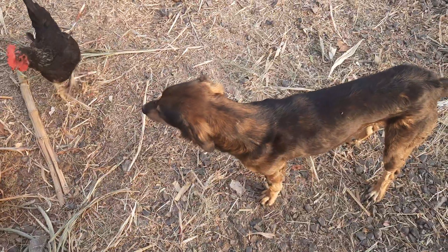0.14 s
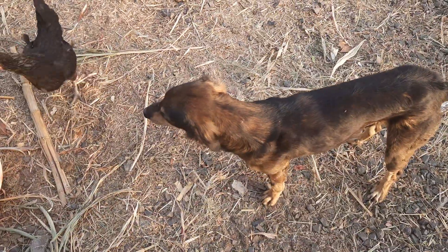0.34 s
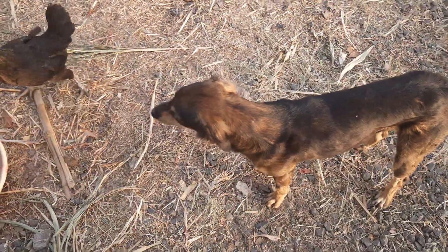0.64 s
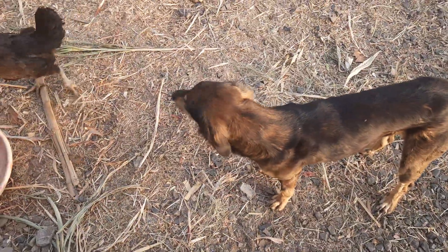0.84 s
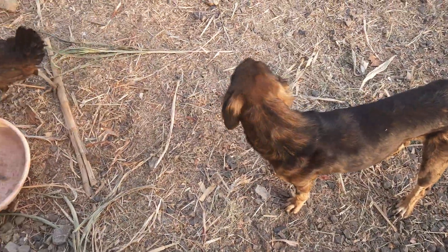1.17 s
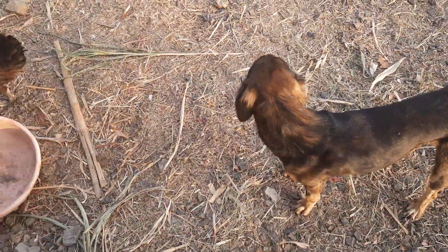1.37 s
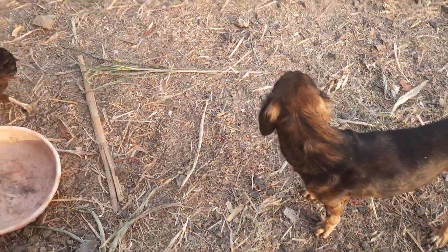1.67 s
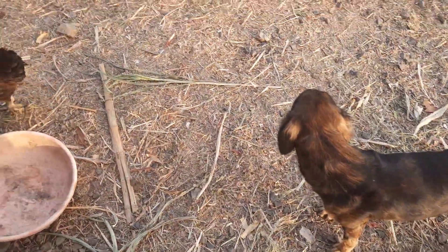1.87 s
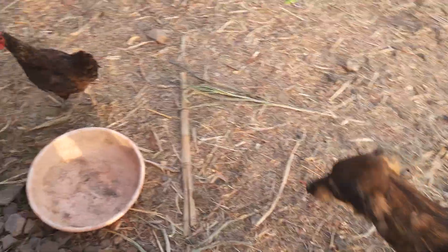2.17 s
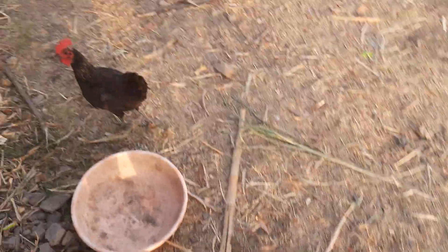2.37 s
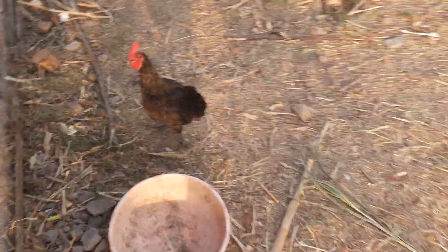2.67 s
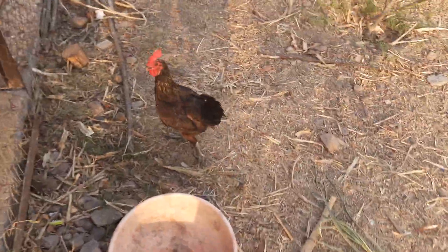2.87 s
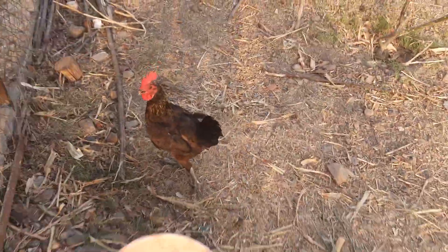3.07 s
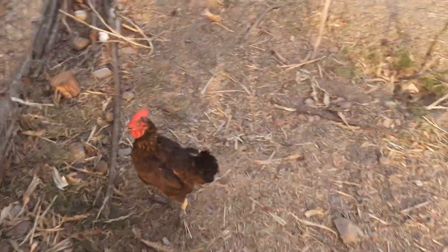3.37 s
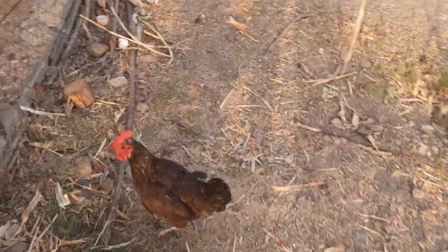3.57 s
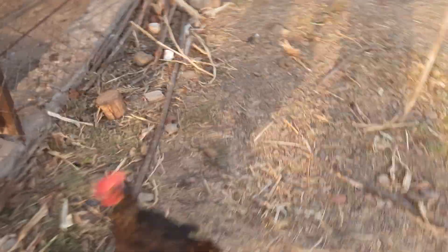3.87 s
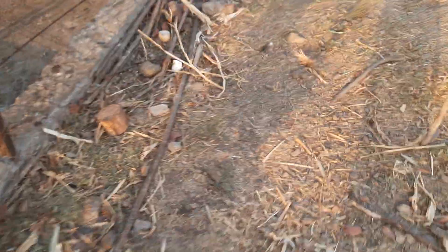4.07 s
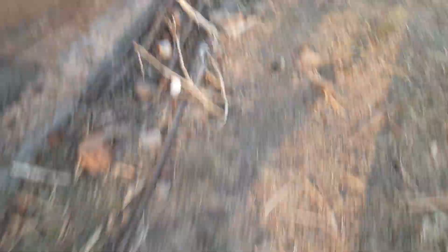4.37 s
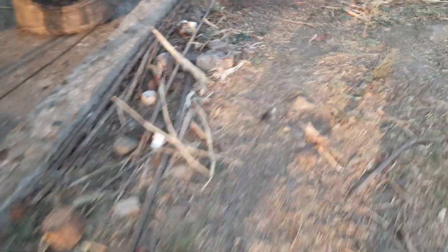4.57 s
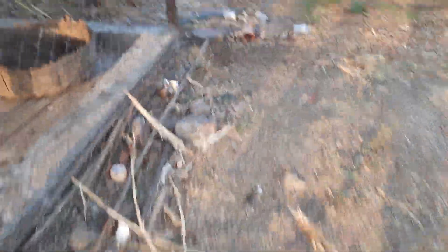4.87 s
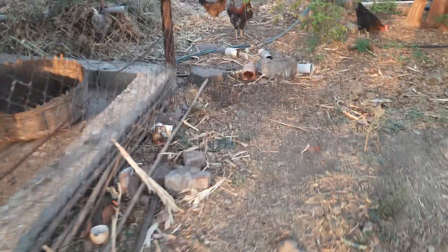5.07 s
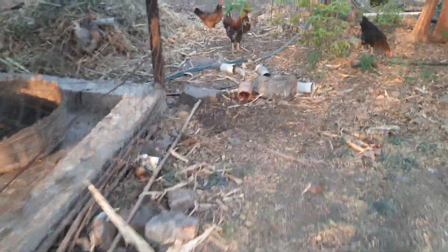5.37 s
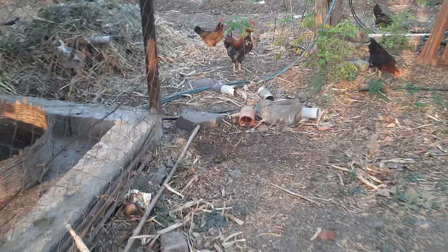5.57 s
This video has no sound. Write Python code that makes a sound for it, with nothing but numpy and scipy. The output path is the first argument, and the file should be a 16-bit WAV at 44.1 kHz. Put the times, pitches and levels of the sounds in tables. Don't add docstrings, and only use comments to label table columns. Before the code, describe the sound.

An open, dry yard with soft hissy air, a faint distant motor hum and a high, rapid cricket trill running almost unbroken. At 0 s the end of another hen's wavering squawk overlaps a close cluck. The close hen then gives short, throaty, pulsing clucks at about 0.3, 0.55, 0.7, 1.1, 1.3, 1.6, 2.1, 2.5 and 2.8 s, each only a few hundredths of a second. Small straw clicks and a sharp tap on the device at 0.8 s fall between them. From 3.2 to 3.8 s hens exchange brief tonal notes and a chick whistles downward; a loud, nasal, trembling squawk starts near 3.6 s and fades by 4.35 s. From 4.5 s straw rustles brightly, snapping densely around 4.95-5.2 s, with a short hen yelp at 5.1 s and smaller ones later. Handling knocks close it near 5.7 s. A dull, short echo follows the birds.

```python
import sys
import numpy as np
from scipy import signal
from scipy.io import wavfile
from scipy.ndimage import uniform_filter1d

SR = 44100
rng = np.random.default_rng(int(sys.argv[2]) if len(sys.argv) > 2 else 0)


def dump(signal):
    limited = np.clip(np.atleast_2d(signal).T, -1, 1)
    pcm = np.round(limited * 32767).astype(np.int16)
    wavfile.write(sys.argv[1], SR, pcm)


def to_linear_factor(level_db):
    exponent = np.asarray(level_db, float) / 20
    return 10 ** exponent


N = 252693
T = np.arange(N) / SR


def rms_one(x):
    return x / np.sqrt(np.mean(x ** 2) + 1e-20)


def in_time(rows):
    s, *columns = np.transpose(rows)
    return [np.interp(T, s, c) for c in columns]


def at_hz(points, hz):
    return np.interp(np.log(hz), np.log(np.array(points)[:, 0]), np.array(points)[:, 1])


def drift(rate, size=N):
    r = np.exp(-80 * np.pi * rate / SR)
    slow = signal.lfilter([1], [1, -2 * r, r * r], rng.standard_normal(size // 40 + 2002))[2000:]
    return np.interp(np.arange(size) / 40, np.arange(len(slow)), rms_one(slow))


def resonance(x, hz, width_hz):
    r, w = np.exp(-np.pi * width_hz / SR), 2 * np.pi * hz / SR
    return signal.lfilter([0, np.sin(w)], [1, -2 * r * np.cos(w), r * r], x + 1e-18)


def filtered(x, order, hz, kind="high"):
    return signal.sosfilt(signal.butter(order, hz, kind, fs=SR, output="sos"), x)


def add(out, s, sound, pan_db=0., lag=0):
    for ch in range(2):
        i = round(s * SR) + ch * lag
        part = sound[:max(N - i, 0)]
        out[ch, i:i + len(part)] += part * to_linear_factor(pan_db / 2 * (1.5 - 2 * ch))


def swell(t, s, length, peak=0.34):
    u = np.clip((t - s) / length, 0, 1)
    bend = np.log(.5) / np.log(np.clip(peak, .1, .9))
    return np.sin(np.pi * u ** bend) ** 2


# time in seconds, pitch in Hz, level in dB.
MOTOR_CURVE = [(0.0, 81.2, -59.5), (1.08, 79.6, -65.5), (2.09, 73.5, -60), (2.31, 69, -55.5),
               (2.62, 69.8, -55), (2.71, 64.2, -49.5), (2.81, 68.8, -59), (3.78, 70.8, -54.5),
               (4.24, 67.9, -58.5), (5.14, 67.6, -55.5), (5.23, 67.9, -59), (5.65, 69.3, -56),
               (5.68, 69.0, -42), (5.73, 66.6, -52)]


def motor():
    hz, db = in_time(MOTOR_CURVE)
    phase = 2 * np.pi * np.cumsum(hz) / SR
    shared = [drift(7), drift(7)]
    line = []
    for ch in range(2):
        steady = 2.6 + shared[0] + drift(7)
        wander = shared[1] + 1.3 * drift(7)
        line.append(steady * np.sin(phase) + wander * np.cos(phase))
    return to_linear_factor(db) * rms_one(np.array(line)) * to_linear_factor([[-1], [1]])


# frequency in Hz, level in dB per half octave.
YARD_AIR = [(30, -63.5), (150, -75.5), (400, -68.5), (1200, -70), (2400, -63), (5000, -65.5), (9000, -59.5),
            (15000, -69)]
# frequency in Hz, likeness from 0 to 1.
LIKENESS = [(30, 1), (200, 0.51), (500, 0.76), (2000, 0.089), (8000, 0), (15000, 0.013)]
# time in seconds, level in dB.
STIR = [(0.0, -57), (0.54, -66.5), (1.29, -62), (1.77, -67.5), (2.94, -61), (3.06, -59), (4.42, -55.5),
        (4.55, -51.5), (5.01, -53.5), (5.34, -50.5), (5.54, -50), (5.73, -44)]
# frequency in Hz, share of the stir's swing.
FOLLOWS = [(100, 0.19), (1000, 0.68), (4000, 0.86), (12000, 1.22)]
# start in seconds, length in seconds, level in dB,
# moment of the peak from 0 to 1.
RUBS = [
    (2.892, 0.18, -59.5, 0.78),
    (3.129, 0.062, -49.5, 0.52),
    (3.184, 0.14, -56.5, 0.14),
    (3.37, 0.12, -63, 0),
    (3.482, 0.058, -63, 0.34),
    (3.673, 0.11, -64, 0.42),
    (3.79, 0.13, -62.5, 0.6),
    (4.297, 0.21, -60, 0.65),
    (5.313, 0.3, -59.5, 0.43),
]
# frequency in Hz, level in dB per half octave.
RUB_TONE = [(150, -17), (500, 10), (1500, 9.5), (4000, 8), (8000, 14), (14000, 15.5)]
# frequency in Hz, left over right in dB.
RUB_PAN = [(500, 22), (3000, 0), (10000, 57)]
# start in seconds,
# length in seconds, level in dB, centre in Hz, left over right in dB.
SCUFFS = [(3.37, 0.22, -52, 1600, 3), (2.78, 0.1, -52, 1100, -2), (5.5, 0.04, -47, 1500, 1),
          (3.273, 0.36, -56, 406, 6), (4.2, 0.31, -56.5, 327, 0), (3.67, 0.28, -45, 1700, 4),
          (0.17, 0.16, -53, 4370, -2), (0.0, 0.088, -56.5, 174, 5), (0.586, 0.086, -55.5, 4020, 0),
          (0.82, 0.061, -62, 493, 10), (1.876, 0.35, -53, 2780, -0.5), (1.89, 0.22, -63, 503, 1),
          (2.376, 0.45, -50.5, 1980, -2.5), (2.428, 0.4, -53.5, 413, 4), (2.62, 0.24, -61, 152, -18),
          (2.915, 0.042, -49.5, 2530, -2), (3.47, 0.72, -51.5, 510, 3), (4.25, 0.15, -45, 4230, -1),
          (4.28, 0.25, -52.5, 1080, 16), (4.531, 0.043, -42, 3660, 4), (4.582, 0.18, -43, 6230, -1),
          (4.683, 0.092, -39, 7500, -0.5), (4.647, 0.13, -48.5, 200, 1), (4.82, 0.17, -57.5, 231, 6),
          (4.885, 0.26, -41, 5500, 1.5), (4.956, 0.34, -61.5, 402, 15), (5.262, 0.3, -55, 360, 21),
          (5.485, 0.067, -51, 2500, -15)]


def rustle():
    stir_rest_db, scuff_db_per_octave = -62, 9.5
    t, side = T[::64], np.array([[.5], [-.5]])
    stir_db = in_time(STIR)[0]
    stir = np.clip((stir_db + 85) / 14, 0, 1)
    struck = rng.random((2, 2, N)) < .03
    force = to_linear_factor(7.2 * np.minimum(rng.exponential(1, (2, 2, N)), 4))
    grains = struck * force * rng.choice([-1, 1], (2, 2, N))
    white = rng.standard_normal((2, 2, N)) + 0.31 * stir * rms_one(grains)
    out, edges = np.zeros((2, N)), 30 * 2 ** np.arange(0, 9.6, .5)
    for k, (low, high) in enumerate(zip(edges, np.minimum(edges[1:], 19000))):
        mid, other = rms_one(filtered(white[k % 2], 2, [low, high], "band"))
        hz = np.sqrt(low * high)
        alike = at_hz(LIKENESS, hz)
        rest_db = at_hz(YARD_AIR, hz) + at_hz(FOLLOWS, hz) * (stir_db[::64] - stir_rest_db)
        power = np.zeros((2, len(t))) + to_linear_factor(2 * rest_db)
        for s, length, db, peak in RUBS:
            rub_db = db + at_hz(RUB_TONE, hz) + (side - .5) * at_hz(RUB_PAN, hz)
            power += to_linear_factor(2 * rub_db) * swell(t, s, length, peak)
        for s, length, db, centre_hz, pan_db in SCUFFS:
            scuff_db = db - scuff_db_per_octave * abs(np.log2(hz / centre_hz)) + side * pan_db
            power += to_linear_factor(2 * scuff_db) * swell(t, s, length)
        gain = np.array([np.interp(T, t, np.sqrt(p)) for p in power]) * to_linear_factor(2.4 * drift(12))
        both = np.sqrt(1 + alike) * mid + np.sqrt(1 - alike) * other * [[1], [-1]]
        out += gain * both / np.sqrt(2)
    return out


# time in seconds, level in dB.
CRICKET_LEVEL = [(0, -58), (.9, -58), (1.2, -60), (1.8, -63.5), (2.25, -57), (2.6, -52.5), (3.5, -56),
                 (4.3, -59), (5.73, -61)]
# first chirp in seconds, end in seconds, seconds per chirp.
PHRASES = [
    (.044, .99, .0587),
    (1.076, 2.43, .05843),
    (2.479, 3.7, .0578),
    (3.814, 4.52, .058),
    (4.705, 5.7, .0582),
]


def cricket():
    out, u = np.zeros((2, N)), np.linspace(0, 1, round(.012 * SR))
    chirps = np.concatenate([np.arange(*phrase) for phrase in PHRASES])
    for s, chance in zip(chirps, rng.standard_normal((len(chirps), 2, 3 + len(u)))):
        for second, c in enumerate(chance):
            pitch = (8550 - 1850 * u) * (1 + .02 * c[0])
            teeth = 1 + 2.2 * uniform_filter1d(c[3:], size=22)
            stroke = np.sin(2 * np.pi * np.cumsum(pitch) / SR) * np.sin(np.pi * u) ** 2 * teeth
            add(out, s - .006 + second * .0195, stroke * to_linear_factor(2.2 * c[1]), pan_db=-1 + 1.5 * c[2])
    blur = filtered(rng.standard_normal((2, N)), 2, [6900, 8400], "band")
    return to_linear_factor(in_time(CRICKET_LEVEL)[0]) * (rms_one(out) + to_linear_factor(-2.5) * rms_one(blur))


# time in seconds, peak in dB, ring in Hz, left over right in dB.
SNAPS = [(0.173, -25.5, 1980, 2), (0.175, -25, 5500, 4), (0.2359, -31, 4385, -11), (0.6117, -26, 7700, -22),
         (2.022, -35, 2670, 1), (2.1607, -39, 8350, -4), (2.2022, -35, 8400, 12.5), (2.339, -40, 7360, 12),
         (2.4537, -41, 2130, 10), (2.8599, -55, 7700, 5), (2.915, -49, 2730, 16), (3.144, -40, 3230, 26),
         (3.1644, -36, 3800, 25), (4.5439, -29.5, 2400, 7), (4.9345, -31.5, 1120, 2),
         (4.9363, -31, 3800, 4), (4.9465, -25, 3930, 4), (4.953, -19.5, 4420, 6), (4.973, -21, 4620, 5),
         (4.9844, -28, 2410, -1), (4.992, -25.5, 7400, 9), (5.008, -21, 7260, 2),
         (5.0464, -22.5, 8600, 14.5), (5.06, -35, 2510, -20), (5.0856, -35.5, 2700, 15),
         (5.092, -32, 2670, 0), (5.1692, -30, 4700, 5), (5.268, -34, 7090, -5), (5.4898, -22, 2560, -5),
         (5.5048, -22.5, 2870, 4), (4.949, -31, 2800, 3), (4.9773, -23, 5000, 3), (5.0052, -34, 8340, 15),
         (5.129, -33, 6500, 3), (5.186, -30, 7500, 5), (5.018, -39, 2500, 0), (5.03, -37, 1500, 2),
         (5.044, -39, 6000, -1), (5.1722, -31, 2800, 7), (4.836, -34.5, 4260, -1), (2.925, -47, 3800, 9),
         (2.933, -46, 2800, 5), (2.974, -38, 7400, 13), (3.059, -38, 6500, 15), (3.13, -47, 496, 18),
         (3.258, -42, 450, 17), (2.517, -37, 427, 14), (2.5455, -37, 600, -2), (5.285, -43, 336, 11)]


def snaps():
    out, t = np.zeros((2, N)), T[:500]
    for (s, db, hz, pan_db), noise in zip(SNAPS, rng.standard_normal((len(SNAPS), 500))):
        crack = noise * np.exp(-t / .0009)
        ring = resonance(crack, hz, .35 * hz)
        sound = .6 * ring + .22 * signal.lfilter([1, 0, -1], [1, -.6], crack)
        add(out, s, to_linear_factor(db) * sound / abs(sound).max(), pan_db)
    return out


# time in seconds, peak in dB, thud in Hz,
# tick against the peak in dB, left over right in dB.
TAPS = [(0.8341, -11.5, 580, 1.5, -21.5), (0.8388, -26, 890, 0, -5), (0.838, -38, 250, -30, 14),
        (5.032, -31, 500, -8, 6), (5.4898, -26, 517, -11, -3), (5.5054, -21, 680, 1.5, 8),
        (0.612, -22.5, 494, -29, -10), (2.72, -28, 115, -33, -33), (3.78, -24, 770, -21, 17),
        (3.787, -17.5, 606, -32.5, -19), (5.578, -36, 330, -21, -50), (5.665, -12, 420, -32, -14),
        (5.673, -13, 164, -39, -16), (5.6857, -13.5, 237, -5, -19), (5.706, -30, 303, -2, -7)]


def taps():
    thud_cycles = 5
    out, t = np.zeros((2, N)), T[:4000]
    for (s, db, hz, tick_db, pan_db), noise in zip(TAPS, rng.standard_normal((len(TAPS), 4000))):
        thud = np.sin(2 * np.pi * hz * t + .8 * to_linear_factor(min(tick_db, 0)))
        thud *= to_linear_factor(-60 * t * hz / thud_cycles) * (1 - np.exp(-t / .0001))
        tick = (1 + .5 * noise) * np.exp(-t / .00012)
        add(out, s + 30 / SR, to_linear_factor(db) * (thud + to_linear_factor(tick_db) * tick), pan_db, lag=-30)
    return filtered(out, 3, 185)


def yard_echo(x):
    hold_s, echo_hz = .07, 940
    t = T[:12000]
    fade = 1 / (1 + (t / hold_s) ** 5) + .2 * to_linear_factor(-60 * t / .4)
    echo = rng.standard_normal((2, 12000)) * np.clip((t - .01) / .012, 0, 1) * fade
    dull = resonance(resonance(echo, echo_hz, 600), echo_hz, 900)
    echo = dull * .12 + .5 * np.diff(echo, prepend=0)
    echo /= np.sqrt((echo ** 2).sum(axis=1, keepdims=True))
    return signal.fftconvolve(x, echo, axes=1)[:, :N]


def voiced_notes(table, partial, bend, floor_db, rough, peak=0.84):
    out = np.zeros((2, N))
    for s, length, start_hz, end_hz, db in table:
        u = np.linspace(0, 1, round(length * SR))
        throat_hz = partial * (start_hz + end_hz) / 2
        hz = start_hz + (end_hz - start_hz) * u ** bend
        hz = hz * (1 + .04 * rough * drift(150, size=len(u)))
        k = np.arange(1, 9)[:, None]
        off = (k * hz - throat_hz) / throat_hz
        floor = to_linear_factor(floor_db) / (1 + (1 + off) ** 5.0) / (1 + (240 / (k * hz)) ** 8)
        gain = floor + 1 / (1 + (off / .12) ** 4)
        phase = k * 2 * np.pi * np.cumsum(hz) / SR + rng.uniform(0, 5.2, (8, 1))
        voice = (gain * np.sin(phase)).sum(axis=0)
        voice = rms_one(voice) * to_linear_factor(8 * rough * drift(120, size=len(u)))
        add(out, s, to_linear_factor(db) * voice * np.sin(np.pi * u ** peak) ** .7, lag=5)
    return out


# start in seconds, length in seconds, pitch in Hz at the start,
# pitch in Hz at the end, level in dB.
PEEPS = [
    (3.252, .075, 2290, 2070, -46.5),
    (3.295, .088, 2110, 1860, -45.5),
    (3.375, .05, 2040, 2060, -55),
    (3.412, .1, 2150, 1680, -43),
    (3.488, .05, 1660, 1510, -47.5),
    (.62, .075, 2320, 2420, -59),
    (.85, .035, 2500, 2620, -59),
    (1.675, .04, 2330, 2290, -59),
    (4.265, .07, 1810, 1460, -44),
    (5.43, .03, 2830, 2720, -52),
]


def chick():
    return voiced_notes(PEEPS, 1, bend=1.6, floor_db=-40, rough=.3, peak=.9)


# start in seconds, length in seconds, pitch in Hz at the start,
# pitch in Hz at the end, level in dB.
YELPS = [
    (4.635, 0.0064, 796, 746, -49),
    (4.648, 0.0084, 750, 716, -41),
    (4.891, 0.011, 870, 800, -42.5),
    (5.1165, 0.021, 907, 702, -31.5),
    (5.705, 0.014, 900, 750, -40),
    (5.719, 0.012, 1000, 800, -38),
]
DULL_YELPS = [
    (5.103, 0.019, 1190, 1060, -48),
    (5.42, 0.051, 267, 432, -47),
    (5.503, 0.028, 1030, 805, -37),
    (5.529, 0.045, 810, 746, -45),
]


def yelps():
    bright = voiced_notes(YELPS, 1.85, bend=.6, floor_db=-1, rough=.45, peak=.45)
    return bright + voiced_notes(DULL_YELPS, 1.05, bend=.6, floor_db=-6, rough=.95, peak=.4)


# top of the swell in seconds, pitch in Hz,
# level in dB, dip after it in dB.
SQUAWKS = [
    [(0.0, 473, -33.5, 0.5), (.04, 488, -31.5, 7), (.12, 480.7, -32, 6), (.14, 470, -35, 13),
     (.19, 460, -33, 1), (.212, 453, -32.5, 8.5), (.235, 444, -47, 11)],
    [(3.57, 404.2, -29, 0.5), (3.635, 420, -31.5, 1), (3.695, 449.2, -25.5, 4), (3.742, 440.5, -29, 5),
     (3.812, 454, -25, 11), (3.892, 463.5, -26, 9.5), (3.972, 472.8, -24, 8.5), (4.062, 478.2, -26.5, 8.5),
     (4.152, 470.4, -26, 9.5), (4.236, 459, -26.5, 3.5), (4.272, 457.5, -39, 7), (4.32, 424, -36.5, 11)],
]
# frequency in Hz, level in dB.
SQUAWK_TRACTS = [
    [(450, -4), (970, -2.5), (1450, 5.5), (1930, -2.5), (2420, -11), (2900, -6), (3400, -10), (3900, -9),
     (4350, -3.5), (4850, -7), (5400, -5), (5800, -10), (6300, -5), (8000, -22.5)],
    [(450, 0), (920, -4), (1380, 0.5), (1840, -2), (2320, -6), (2760, -15.5), (3260, -4.5), (3680, -20),
     (4000, -0.5), (4350, 4.5), (4520, 1), (4800, -15), (4950, -13), (5400, -6), (5900, -14), (6400, -5),
     (7300, -17), (9000, -28)],
]
PITCH_SAG_PER_DB = [.001, .0048]
# frequency in Hz, left over right in dB.
SQUAWK_PAN = [(900, 0.5), (1400, -7.5), (1850, -7), (2400, -8), (4300, -8.5), (6500, 2)]


def squawks():
    shut_db, open_db = -20.5, 2
    out = np.zeros((2, N))
    for rows, tract, sag_share in zip(SQUAWKS, SQUAWK_TRACTS, PITCH_SAG_PER_DB):
        s, hz, db, dip_db = np.transpose(rows)
        t = T[(T >= s[0]) & (T < s[-1] + .05)]
        size = len(t)
        count = np.interp(t, np.r_[s, s[-1] + .08], np.arange(len(s) + 1))
        throb, dip = count % 1, dip_db[count.astype(int)]
        sag = dip * np.sin(np.pi * throb ** .8) ** 4
        slack = np.minimum(throb / .3, 1 - np.clip((throb - .3) / .7, 0, 1) ** 2.2)
        waver = .003 * drift(70, size=size) + .003 * drift(22, size=size)
        pitch = np.interp(t, s, hz) * (1 - sag_share * dip * slack + waver)
        phase = 2 * np.pi * np.cumsum(pitch) / SR
        air = signal.lfilter([.2], [1, -.95], rng.standard_normal((2, size)))
        breath = (.28 + .075 * sag + np.clip((t - s[-2]) / .06, 0, 1)) * air
        voice = np.zeros((2, size))
        for k in range(1, 20):
            opens_s = np.interp(k, [3, 7, 9], [0.27, 0.25, 0.22])
            bright_db = open_db
            if s[0] > 0:
                bright_db = np.interp(t - s[0], [0, opens_s], [shut_db, open_db])
            beak_db = bright_db * np.interp(k, [1, 3, 9], [0, 1, .95])
            level_db = at_hz(tract, k * pitch) + beak_db - .25 * sag * (k > 6)
            for ch in range(2):
                shimmer = to_linear_factor(2.4 * drift(30, size=size))
                late = ch * (2 * np.pi * k * 460 * 11 / SR + rng.normal(0, .2))
                gain = to_linear_factor(level_db + (.5 - ch) * at_hz(SQUAWK_PAN, k * 460)) * shimmer
                gain = gain * (1 + breath[ch] * min(k / 11, 1.5) ** 2.2)
                voice[ch] += gain * np.sin(k * phase + .06 * k ** 2 + .2 * drift(10, size=size) - late)
        fade_in = np.clip((t - s[0]) / .02 + (s[0] == 0), 0, 1)
        fade_out = np.clip((t[-1] - t) / .02, 0, 1)
        i = round(t[0] * SR)
        out[:, i:i + size] -= rms_one(voice) * to_linear_factor(np.interp(t, s, db) - sag) * fade_in * fade_out
    return out


# start in seconds, length in seconds,
# pitch in Hz at the start, pitch in Hz at the end, level in dB.
LOW_NOTES = [
    (3.192, 0.041, 288, 299, -31.5),
    (3.378, 0.045, 289.6, 294, -32),
    (3.513, 0.04, 272, 288, -35),
    (3.55, 0.036, 291, 292, -40),
    (3.622, 0.042, 296.5, 268, -33.5),
]
HIGH_NOTES = [
    (3.475, 0.05, 306.3, 326, -30),
    (3.585, 0.047, 344, 322.7, -25.5),
    (3.672, 0.022, 351, 328, -33.5),
    (3.708, .05, 360, 318, -22.5),
]


def tonal_notes():
    low = voiced_notes(LOW_NOTES, 3.9, bend=1.2, floor_db=-4.5, rough=.24)
    return low + voiced_notes(HIGH_NOTES, 3, bend=1.2, floor_db=-9, rough=.22)


# start in seconds, level in dB, pulses per second, length in seconds, throat in Hz.
CLUCKS = [
    (0.012, -20, 170, 0.032, 635),
    (0.334, -17, 163, 0.024, 593),
    (0.552, -17, 181, 0.027, 650),
    (0.719, -18, 173, 0.028, 610),
    (1.122, -19, 177, 0.026, 648),
    (1.337, -20, 152, 0.025, 633),
    (1.618, -24, 190, 0.0356, 605),
    (2.094, -24.5, 159, 0.035, 530),
    (2.461, -18, 176, 0.032, 557),
    (2.777, -17.5, 169, 0.031, 567),
]
# frequency in Hz, width in Hz, level in dB.
CLUCK_THROAT = [(890, 173, -1.5), (1196, 240, 1.5), (1664, 280, -1.5), (2400, 480, -26), (3040, 240, -30),
                (3800, 400, -30)]
# level in dB of the first,
# the second, the third and the higher resonances.
BEAK = [(-2.5, -9.5, -16, 5), (-8, -8, -13, 0.5), (-4.5, -7.5, -13, -4), (-14.5, -5.5, -14.5, -2),
        (-18, -12.5, -16.5, -3.5), (-7.5, -19, -20.5, -1.5), (-10, -13, -19, 1.5), (-13, -6, -16, 4),
        (-4, -0.5, -9, 4), (-9, 2.5, -10, 0.5)]


def clucks():
    out = np.zeros((2, N))
    chances = rng.standard_normal((len(CLUCKS), 2, 4000))
    for (s, db, rate, length, hz), beak_db, chance in zip(CLUCKS, BEAK, chances):
        gaps = (1.05 - .06 * np.arange(11) + .05 * chance[0, 1:12]) / rate
        at = np.cumsum(np.r_[0, gaps])
        at = at[at < length]
        force = np.sin(np.pi * (.19 + .66 * (at / length) ** 1.4))
        slaps = np.zeros(4000)
        slaps[(at * SR).astype(int)] = force * to_linear_factor(1.2 * chance[0, 20:20 + len(at)])
        puffs = signal.lfilter([1], [1, -.985], slaps) * chance[1] * 0.31
        voice = resonance(resonance(slaps, hz, 250), hz, 250) * .045
        driven = (slaps + puffs) * np.clip(0.6 + T[:4000] / length, 0, 1)
        for k, (f, w, g) in enumerate(CLUCK_THROAT):
            f = f * (1 + .025 * chance[0, 40 + k])
            gain = (-1) ** k * to_linear_factor(g + beak_db[min(k, 3)])
            voice += gain * resonance(resonance(driven, f, w), f, w) * 2 * np.pi * w / SR
        voice = filtered(voice, 2, 280)
        loudness = np.sqrt(np.sum(voice ** 2) / (length * SR))
        add(out, s, to_linear_factor(db) * voice / (2.93 * loudness), pan_db=-2.0, lag=17)
    return out


def scene():
    near, yelping, far, hen = tonal_notes(), yelps(), squawks(), clucks()
    to_walls = to_linear_factor(-26.5) * hen + to_linear_factor(-22) * near + to_linear_factor(-24) * yelping + to_linear_factor(-27) * far
    birds = hen + near + yelping + chick() + far + yard_echo(to_walls)
    return birds + cricket() + snaps() + taps() + rustle() + motor()


def low_pass(x):
    return signal.sosfilt(signal.butter(12, 17020, fs=SR, output="sos"), x)


def record(dry):
    dip_hz, dip_width_hz, dip_share = 9800, 1780, 0.63
    dip = signal.lfilter(*signal.iirpeak(dip_hz, dip_hz / dip_width_hz, fs=SR), dry)
    mic = filtered(dry - dip_share * dip, 3, 53)
    cut = signal.sosfilt(signal.cheby2(14, 70, 16300, fs=SR, output="sos"), mic)
    return low_pass(cut)


dry = scene()
out = record(dry)
dump(out)
```